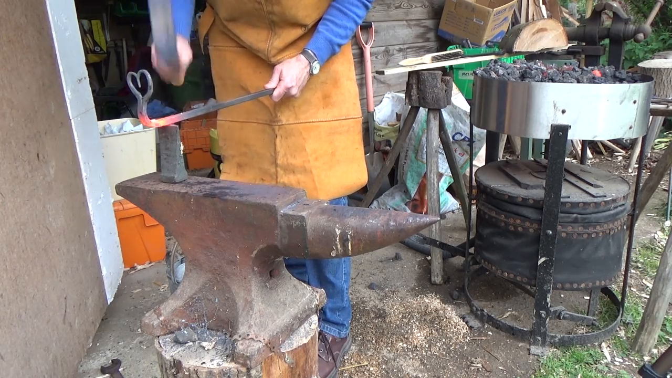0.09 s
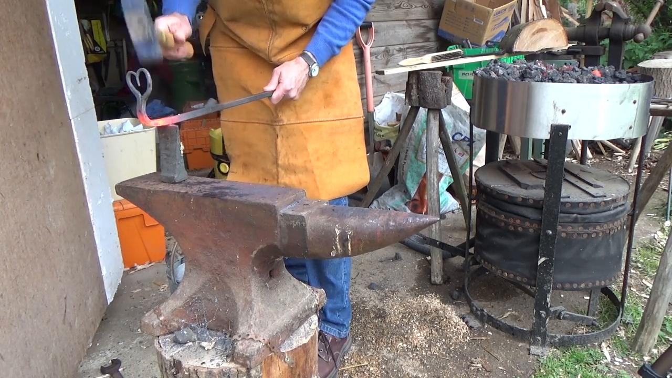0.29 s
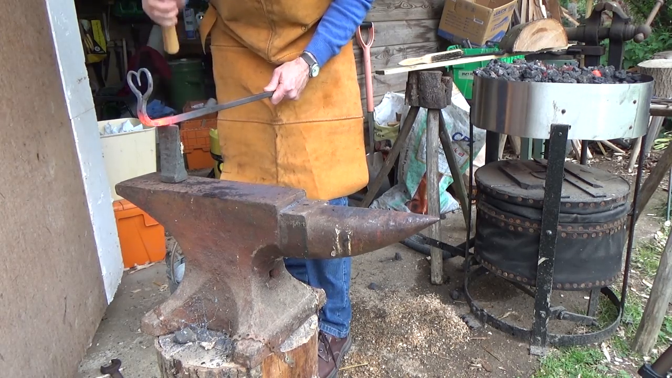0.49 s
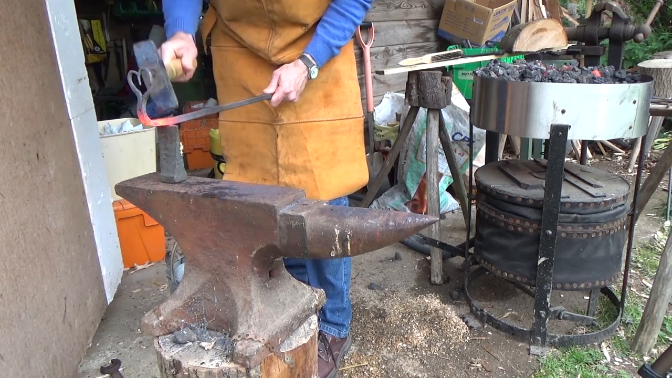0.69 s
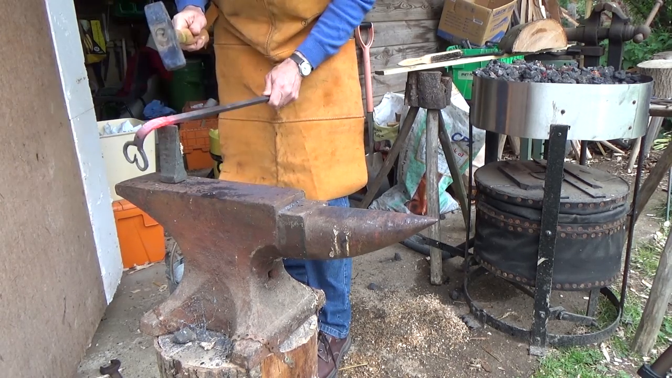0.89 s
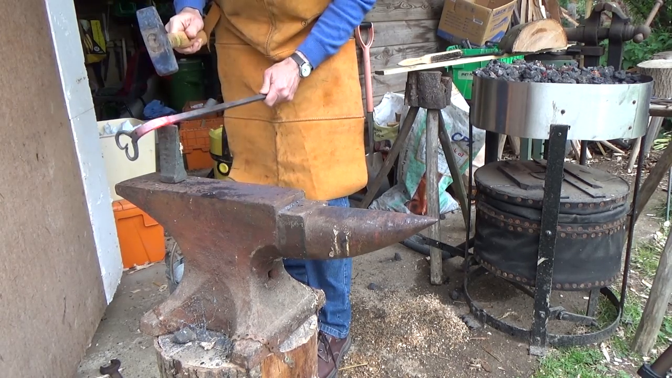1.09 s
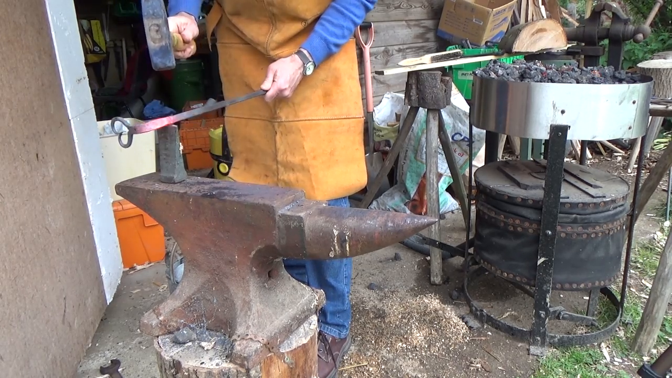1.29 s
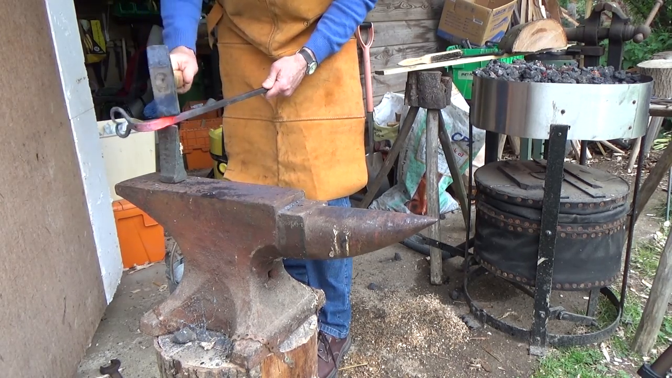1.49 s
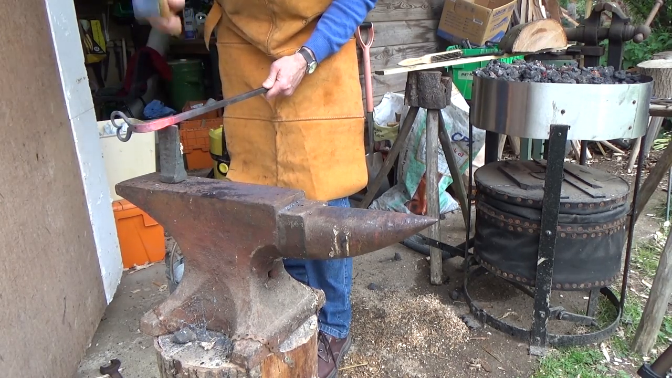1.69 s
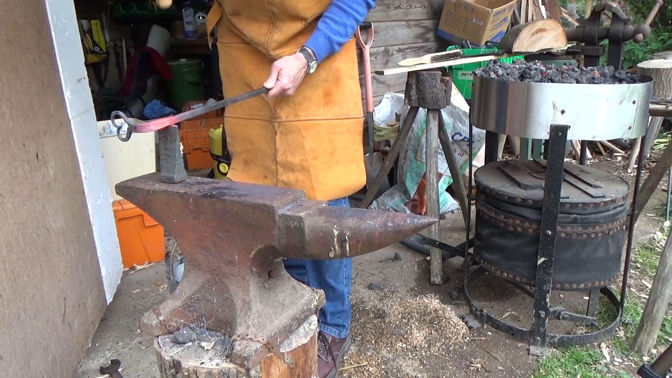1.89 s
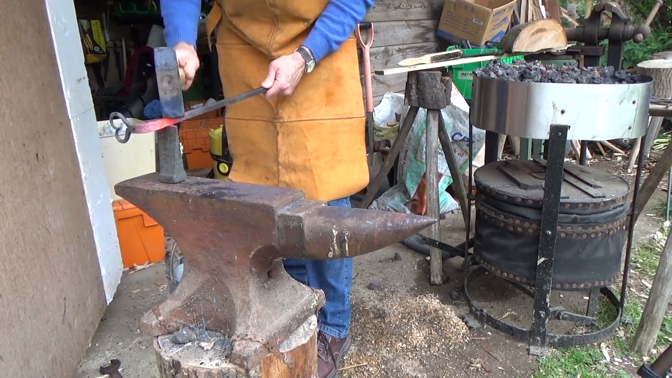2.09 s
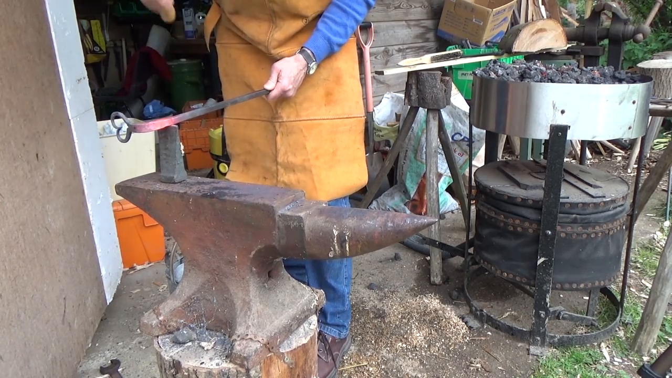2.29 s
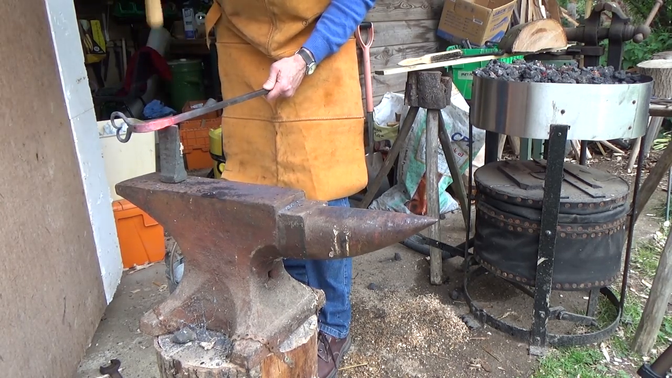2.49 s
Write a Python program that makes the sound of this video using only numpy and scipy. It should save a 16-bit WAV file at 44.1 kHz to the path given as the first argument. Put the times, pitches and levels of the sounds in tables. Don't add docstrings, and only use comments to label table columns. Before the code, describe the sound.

Hammer on anvil, close stereo microphone in an open shed: a fading ring, two hard clanging blows with quick rebounds, an abrupt cut to quieter air and tiny ticks, then a duller blow and a hard ringing one.

```python
import sys
import numpy as np
from scipy import signal
from scipy.io import wavfile
from scipy.ndimage import uniform_filter1d

SR = 44100
rng = np.random.default_rng(int(sys.argv[2]) if len(sys.argv) > 2 else 0)


def decibels_to_gain(level_db):
    exponent = np.asarray(level_db, float) / 20
    return 10 ** exponent


def generate_wav(signal):
    frames = np.transpose(np.atleast_2d(signal))
    scaled = np.clip(frames, -1, 1) * 32767
    pcm = np.round(scaled).astype(np.int16)
    wavfile.write(sys.argv[1], SR, pcm)


N = 112455
CUT_S = 0.8437

# f/Hz, level/dB per Hz
AIR_SPECTRUM = [(25, 2), (85, 2.5), (900, -3), (2600, -2.5), (5200, -10.5), (6300, -21), (11500, -20.5),
                (15750, -29), (16000, -65)]
# t/s, level/dB
AIR_LEVEL = [(0, -43), (.6, -45), (.843, -47.5), (.846, -50), (1.3, -48.5), (1.9, -47), (2.55, -46)]
# f/Hz, likeness/0-1
AIR_SAME = [(60, 1.0), (180, 0.99), (550, 0.88), (1650, 0.5), (4970, 0.61), (15000, 1)]
# f/Hz, level/dB
AIR_LEAN = [(300, 0.4), (1650, -2), (4970, -3.5), (8000, -0.2)]

# t/s, level/dB, f/Hz, scuff level/dB
TICKS = [(0.898, -21.5, 4600, -17.5), (1.058, -31.5, 4000, -19), (1.129, -20, 6000, -18),
         (1.236, -25, 10600, -22), (1.269, -29, 9000, -24), (1.2982, -22, 9600, -18),
         (1.3577, -49, 4000, -25), (1.415, -24, 4000, -29), (1.432, -25, 6900, -18),
         (1.437, -16, 4650, -30), (1.444, -33.5, 11000, -6), (1.506, -44, 10900, -2),
         (1.5408, -17, 4620, -28), (1.846, -23.5, 2980, -27), (2.0208, -34, 9050, -12)]
TICK_DB, SNAP_DAMP = -11.5, 1.4
SCUFF_HZ, SCUFF_NARROW_DB, SCUFF_T60_S = 11000, 31, 0.1

# t/s, crash level/dB, thump level/dB, ring t60 factor/1, crash length factor/1
BLOWS = [
    (0, -52, -71, 0.89, 0.86),
    (.2052, -5.5, -13, 1.123, 1.3),
    (.6838, -5, -15.5, 1.26, 1.03),
    (1.5595, -14, -16.5, 0.84, 1.1),
    (2.1018, -6, -13, 0.98, 1.03),
]
# t/s, crash level/dB, thump level/dB
BOUNCES = [
    (0.232, -12, -19),
    (0.7385, -21, -23.5),
    (1.583, -21.5, -56),
    (2.134, -36, -41),
]
BOUNCE_TILT_DB, BOUNCE_LONG = -6.5, 0.3

# f/Hz, level/dB, t60/s
STUMP = [(88.6, -4, 0.22), (150.6, -0.5, 0.14), (226.7, -4, 0.26), (283, -6.5, 0.53), (342.6, -4, 0.41),
         (361.5, -17.5, 0.94), (440.6, 3, 0.17), (633, 12.5, 0.041), (733, -3, 0.25), (1003, -2, 0.25)]
THUMP_RISE_S = 0.0022
THUD_HZ, THUD_LAG_S, THUD_DB = 318, 0.00078, 10.5

# f/Hz, level/dB per Hz
CRASH_SPECTRUM = [(35, -49.5), (60, -22.5), (318, -9), (1900, -11), (2640, -0.5), (3180, -4),
                  (11900, -12.5), (15400, -28), (16500, -55)]
# f/Hz, t60/s
CRASH_T60 = [(80, 0.39), (400, 0.29), (1500, 0.12), (4000, 0.16), (9000, 0.11), (16000, 0.13)]
CRASH_TILT_DB = [-2, 2, 0.1, -3.5, -0.96]
CRASH_RISE_S, CRASH_SAME, CRASH_LEAN_DB = 0.0022, 0.95, 4
YARD_DB, YARD_LONG = -29.5, 5.1

# f/Hz, t60/s, then level/dB in each of the four heard blows
CLINKS = [(2643, 0.11, 2, -16, -27, -0.5), (2980, 0.043, -32, -30, -7, -37),
          (3770, 0.056, -28, -30, -11, -22), (6200, .15, -30, -36.5, -52, -16),
          (8200, 0.14, -16, -24, -31, -18), (8730, 0.25, -19.5, -24, -33, -16),
          (8970, .09, -3, -17, -33, -24), (11900, 0.15, -8, -9, -43, -26)]
CLINK_RISE_S, RING_RISE_S = 0.0061, 0.036

# f/Hz; the hammer list also repeats the anvil's 2651 and 2665
# Hz modes, heard there mainly in the first hard blow
HAMMER_HZ = [2641, 2649, 2665, 2651, 4634.2]
ANVIL_HZ = [1535, 1648, 2651, 2665, 3448, 3569, 3843, 4639, 5324, 5814.5, 5826, 5845, 5863.5, 6330]
TOOL_HZ = [7022, 7641, 7942, 8741, 8549, 9994, 10534, 11037, 11555, 12026, 12546, 13274, 14180, 15354]
# t60 before the change/s, t60 after/s, left over
# right/dB; close modes near 2650 Hz throb against each other in pairs
HAMMER_DECAY = [(0.9, 0.52, 3.2), (.17, .25, 6), (.17, .2, 6), (.9, .6, 3.2), (1.3, .7, 3)]
ANVIL_DECAY = [(0.41, 0.52, 2), (0.16, 0.33, 2), (0.73, 0.76, -6), (0.13, 0.16, 6), (0.3, 0.33, -6.5),
               (0.29, 0.22, -1), (0.33, 0.7, 1), (0.39, 0.3, 3.5), (0.2, 0.26, 4), (0.27, 0.52, -2.5),
               (0.5, 0.23, 6.5), (0.3, 0.58, 1.7), (0.34, 0.44, 3), (0.24, 0.21, 5.5)]
TOOL_DECAY = [(0.51, 0.63, 0), (0.23, 0.17, -7), (0.36, 0.52, -5), (0.37, 0.37, 9), (0.31, 0.24, -8),
              (0.53, 0.52, 4), (0.2, 0.21, -6), (0.091, 0.35, 5), (0.15, 0.29, 0.5), (0.42, .3, 4.5),
              (0.4, 0.48, 4.5), (0.22, 0.31, -1), (0.35, 0.37, 1), (0.34, 0.57, 2)]
HAMMER_DB = [(-42.5, -34, -28, -52, -29), (-70, 2, -24, -50, -30), (-70, 2, -70, -70, -70),
             (-70, -34, -70, -70, -33), (-60, -40, -44, -60, -38)]
ANVIL_DB = [(-73, -12.5, -8.5, -12, -13.5), (-57, -0.5, 0.5, -9.5, -15.5), (-56, -75, -59, -59, -44),
            (-49, -73, 7.5, -44, 2), (-55, -21, -18.5, -26, -13.5), (-65, -3.5, -11, -9.5, -2),
            (-40.5, -4.5, -10, -24, -11), (-48.5, -8, -13.5, -37, -4.5), (-60, -6, -3.5, -13, -5),
            (-54, 0, 2, -50, -9), (-80, -42, -53.5, -50, -52), (-50.5, -53, -40, -25, -22),
            (-75, 3, 1, -30.5, -6.5), (-83, -7, -27, -35, -5.5)]
TOOL_DB = [(-81, -35, -37, -51, -65), (-81, -18, -13, -50, -3), (-59, -21, -15.5, -27, -17),
           (-85, -33, -44, -43, -17), (-84, -46, -43, -50, -22), (-41.5, -24, -21, -32, -14.5),
           (-71, -33, -13, -27, -3), (-71, -13, -5, -47, -26), (-88, -12, -10, -26, -9.5),
           (-66, -18.5, -25, -52, -47), (-61, -61, -32, -51, -26.5), (-67, -14, -20, -39, -32),
           (-77, -40, -62, -60, -45), (-86, -71, -37, -55, -28.5)]
TURNED = [1.01, 1.01, 0.93, 1.1, 1.01, .55, .95, 1.01, 1.01, 0.87, .8, 0.88, 0.46, .9, 1.01, 0.96, 1.05,
          1.01, 0.83, 0.8, 1.01, 0.9, 0.9, 0.88, 1.17, 1.01, 0.87, 0.84, 1.01, 1.01, 1.01, 1.01, 1.01]
RING_TUNING = [1, 1, 1, 1.0006, 1.0002]
RING_LAG_S = [0, .013, -.0035, .001, .004]
ROCK_HZ, ROCK_TURNS, ROCK_S, ROCK_WIDTH_S = 5814.5, 1.04, 0.118, 0.035

LIMIT_DB, SQUEEZE, RELEASE_DB_PER_S, SENSE_S = -12, 0.91, 314, 0.013
EDGE_HZ = 16300


def read(points, hz):
    f, v = np.transpose(points)
    return np.interp(np.log(hz + 1), np.log(f + 1), v)


def evened(x):
    return x / np.sqrt(np.mean(x ** 2) + 1e-20)


def add(mix, s, sound):
    end = round(CUT_S * SR) if s < CUT_S else N
    part = mix[:, round(s * SR):end][:, :sound.shape[1]]
    part += sound[:, :part.shape[1]]


def noise(n, size, shape, same, lean_db, patchy_db):
    hop = size // 4
    hz = np.fft.rfftfreq(size, 1 / SR)[:, None]
    t = np.arange(n // hop + 5)[None] * hop / SR
    a, b, c, d, patches = rng.standard_normal((t.size, hz.size, 5)).T
    patches = uniform_filter1d(uniform_filter1d(patches, size=8, axis=0), size=8, axis=1)
    likeness, lean = np.clip(same(hz), -1, 1), lean_db(hz) / 2
    shared = a + 1j * b
    right = likeness * shared + np.sqrt(1 - likeness ** 2) * (c + 1j * d)
    z = np.array([shared * decibels_to_gain(lean), right * decibels_to_gain(-lean)])
    z = z * decibels_to_gain(shape(hz, t) + patchy_db * evened(patches))
    return signal.istft(z, nperseg=size, noverlap=size - hop)[1][:, :n]


def air():
    def shape(f, u):
        return read(AIR_SPECTRUM, f) + 0 * u
    x = noise(N, 1024, shape, lambda f: read(AIR_SAME, f), lambda f: read(AIR_LEAN, f), 0.7)
    return evened(x) * decibels_to_gain(np.interp(np.arange(N) / SR, *np.transpose(AIR_LEVEL)))


def scale_tick(db, hz, scuff_db):
    t = np.arange(3000) / SR
    snap = np.sin(2 * np.pi * hz * t) * np.exp(-SNAP_DAMP * t * hz) * 2 - 0.5 * (t == 0)

    def shape(f, u):
        hump = -SCUFF_NARROW_DB * np.log2((f + 1) / SCUFF_HZ) ** 2
        return hump - 14 * (f / 15000) ** 8 - 60 * u / SCUFF_T60_S
    scuff = noise(len(t), 128, shape, lambda f: 0.99 + 0 * f, lambda f: 0 * f, 2.5)
    return decibels_to_gain(db + TICK_DB) * (snap + decibels_to_gain(scuff_db) * scuff / np.std(scuff[:, :200]))


def stump_thump(long, t):
    wobbles = uniform_filter1d(rng.standard_normal((len(STUMP), len(t))), size=900, axis=1) * 30
    thump = 0
    for (hz, db, t60), wobble in zip(STUMP, wobbles):
        swing = np.sin(2 * np.pi * hz * t + 0.45 * wobble)
        thump = thump + decibels_to_gain(db - 60 * t / (long * t60)) * (1 + 0.12 * wobble) * swing
    cycles = np.maximum(t - THUD_LAG_S, 0) * THUD_HZ
    thud = decibels_to_gain(THUD_DB) * np.sin(2 * np.pi * cycles) * cycles * np.exp(-cycles) * np.e
    return (thud + thump * (1 - np.exp(-t / THUMP_RISE_S))) / 3


def crash(long, tilt_db, t):
    def shape(f, u):
        fall_db = -60 * u / (long * read(CRASH_T60, f))
        with_yard = decibels_to_gain(fall_db) + decibels_to_gain(YARD_DB + fall_db / YARD_LONG)
        return read(CRASH_SPECTRUM, f) + tilt_db * np.log2(f / 1000 + 1) + 20 * np.log10(with_yard)

    def same(f):
        return 1 - (1 - CRASH_SAME) * np.minimum(f / 1500, 1)

    def lean_db(f):
        return CRASH_LEAN_DB * (f > 400) * (f < 6000)
    x = noise(len(t), 256, shape, same, lean_db, 2.76)
    return x / np.std(x[:, :400]) * np.minimum(t / CRASH_RISE_S, 1)


def knock(crash_db, thump_db, long, tilt_db, t):
    return decibels_to_gain(crash_db) * crash(long, tilt_db, t) + decibels_to_gain(thump_db) * stump_thump(long, t)


def clinks(k, t):
    total = 0
    for row in CLINKS:
        total = total + decibels_to_gain(row[k + 1] - 60 * t / row[1]) * np.sin(2 * np.pi * row[0] * t)
    return total * (1 - np.exp(-t / CLINK_RISE_S))


def ring(k, damp, t):
    base = np.array(HAMMER_HZ + ANVIL_HZ + TOOL_HZ)[:, None]
    before, after, lean = np.array(HAMMER_DECAY + ANVIL_DECAY + TOOL_DECAY).T
    t60 = after if BLOWS[k][0] > CUT_S else before
    if k == 3:
        t60 = t60 * np.array(TURNED)
    t60 = damp * t60[:, None]
    db = np.array(HAMMER_DB + ANVIL_DB + TOOL_DB)[:, k, None]
    turns = base * RING_TUNING[k] * (t - RING_LAG_S[k])
    if k == 4:
        turns = turns + (base == ROCK_HZ) * ROCK_TURNS * (1 + np.tanh((t - ROCK_S) / ROCK_WIDTH_S)) / 2
    sign = (-1.) ** np.arange(len(base))[:, None]
    modes = sign * decibels_to_gain(db - 60 * t / t60) * np.sin(2 * np.pi * turns)
    out = decibels_to_gain(np.array([lean, -lean]) / 2) @ modes
    if k == 0:
        return out
    return out * (1 - np.exp(-t / RING_RISE_S)) + clinks(k, t)


def scene():
    mix = air()
    t = np.arange(30000) / SR
    for k, (s, crash_db, thump_db, damp, long) in enumerate(BLOWS):
        add(mix, s, ring(k, damp, t) + knock(crash_db, thump_db, long, CRASH_TILT_DB[k], t))
    for s, crash_db, thump_db in BOUNCES:
        add(mix, s, knock(crash_db, thump_db, BOUNCE_LONG, BOUNCE_TILT_DB, t))
    for s, db, hz, scuff_db in TICKS:
        add(mix, s, scale_tick(db, hz, scuff_db))
    return mix


def top_cut(x):
    return signal.sosfilt(signal.butter(12, 16800, fs=SR, output="sos"), x)


def record(dry):
    n = max(round(SENSE_S * SR), 2)
    power_db = 10 * np.log10(abs(uniform_filter1d((dry ** 2).mean(0), n)) + 1e-12)
    fall = np.arange(N) * RELEASE_DB_PER_S / SR
    held_db = np.maximum.accumulate(power_db + fall) - fall
    over_db = np.maximum(held_db - LIMIT_DB, 0)
    x = dry / decibels_to_gain(SQUEEZE * uniform_filter1d(over_db, size=60))
    x = 0.71 * np.tanh(x / 0.93)
    x = signal.sosfilt(signal.butter(3, 55, "high", fs=SR, output="sos"), x)
    x = signal.sosfilt(signal.ellip(8, 0.2, 60, EDGE_HZ, fs=SR, output="sos"), x)
    return top_cut(x)


dry = scene()
out = record(dry)
generate_wav(out)
```